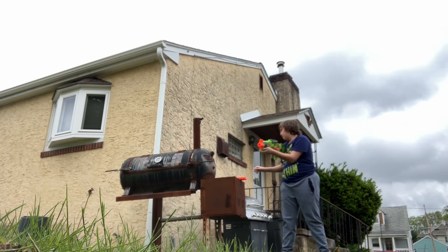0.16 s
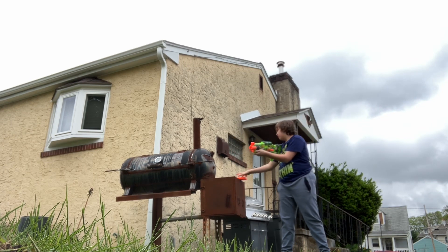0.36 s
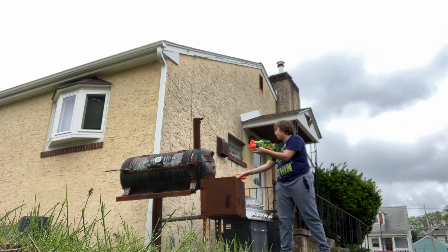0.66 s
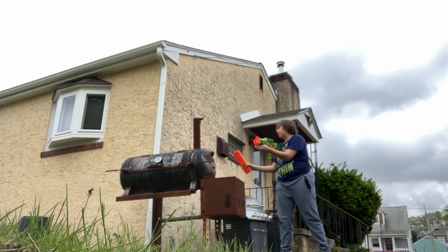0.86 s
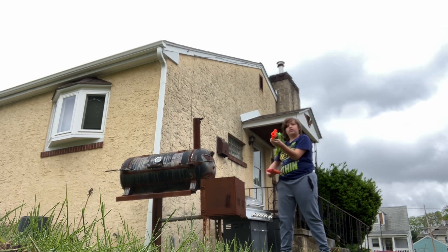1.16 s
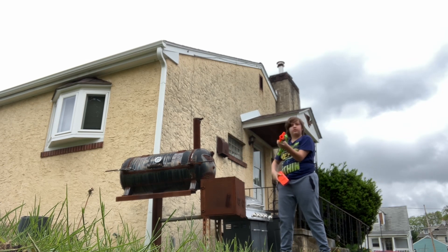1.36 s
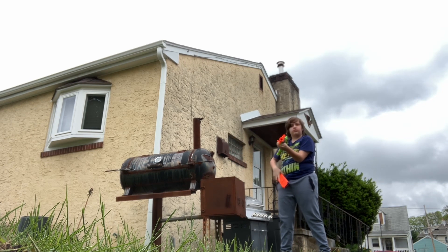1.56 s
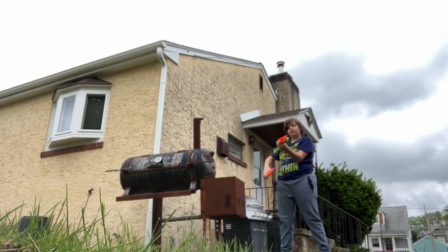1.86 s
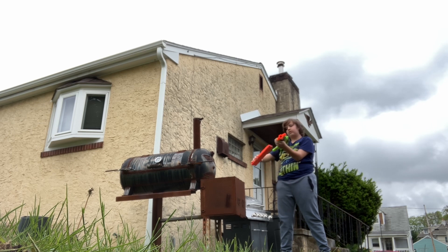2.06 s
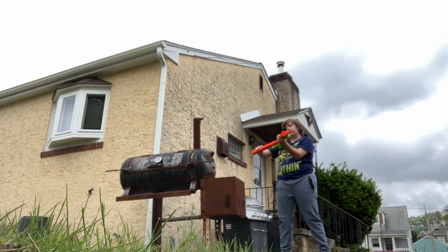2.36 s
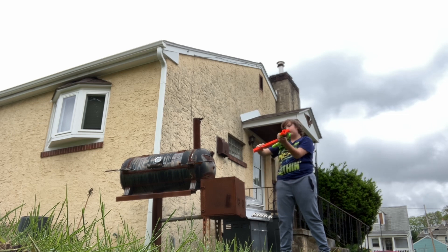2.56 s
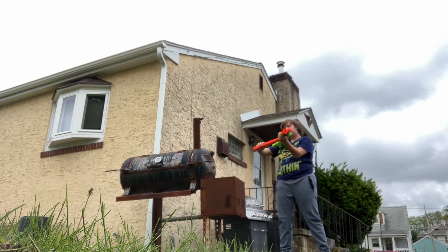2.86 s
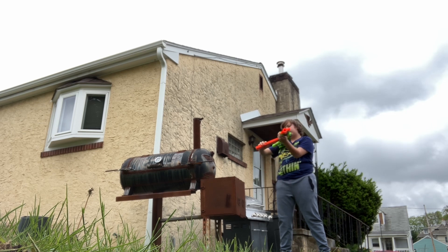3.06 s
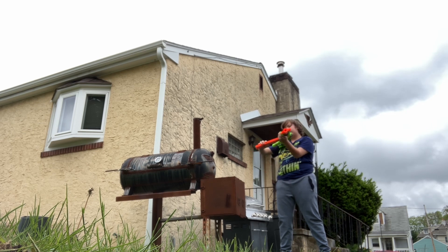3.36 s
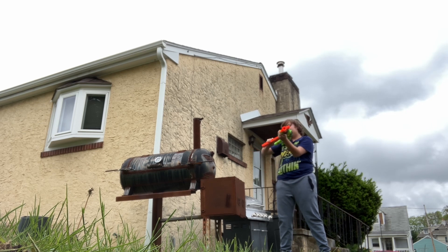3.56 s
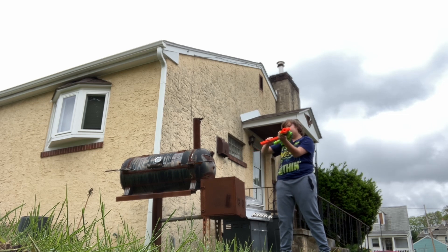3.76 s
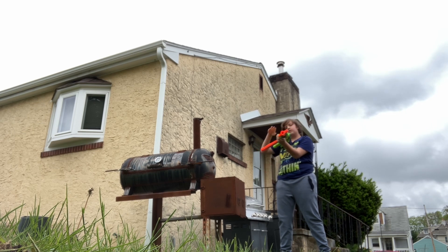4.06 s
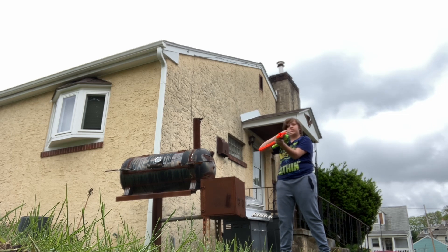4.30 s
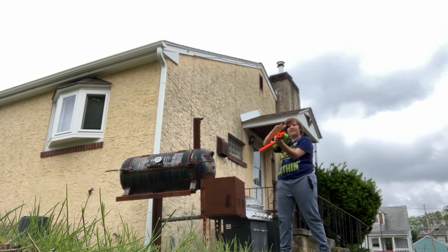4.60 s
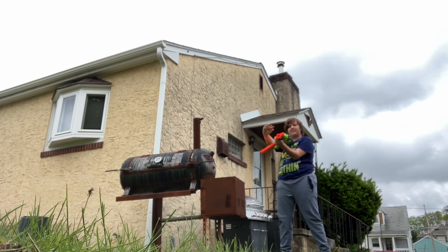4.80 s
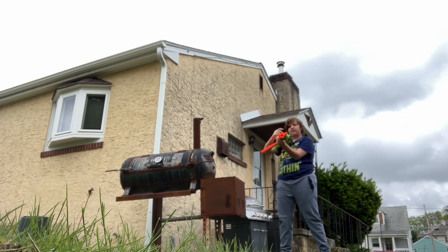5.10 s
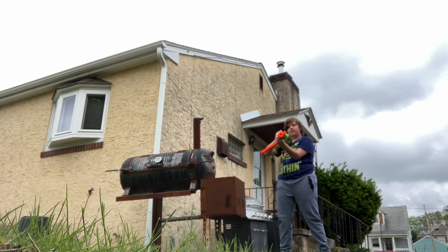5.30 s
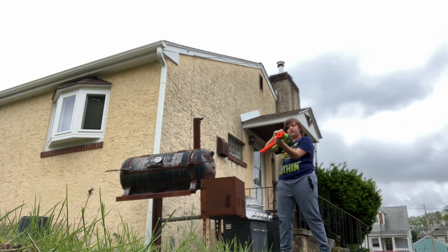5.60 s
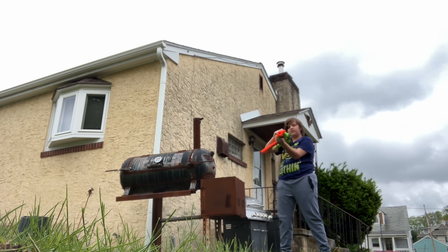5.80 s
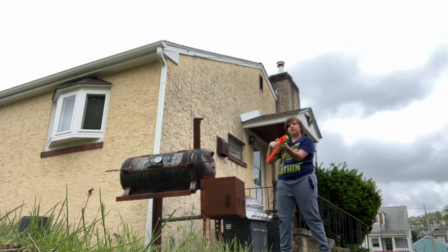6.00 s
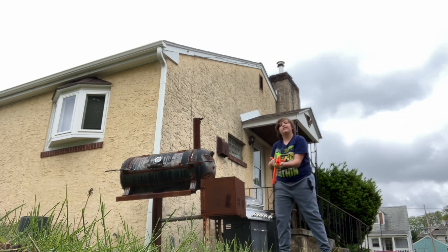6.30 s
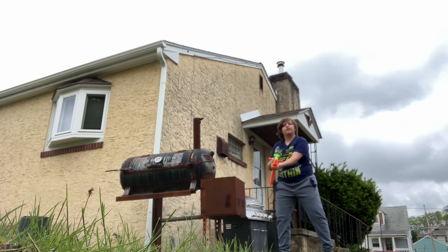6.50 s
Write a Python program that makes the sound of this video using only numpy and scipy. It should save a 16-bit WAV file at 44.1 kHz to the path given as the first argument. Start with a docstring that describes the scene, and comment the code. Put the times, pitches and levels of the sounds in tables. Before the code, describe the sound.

Quiet yard ambience: low town rumble, thin birdsong, some clear and some raspy, a very faint hum and light hiss. Several metres away, light plastic parts tick and click, then a toy gun gives three crisp, hollow snaps roughly a second apart, the first strongest, the middle one more of a ratchety chatter. Dry, short outdoor echoes follow; a last tiny rattle fades into the birds.

```python
"""A plastic toy blaster is loaded and snapped a few metres away on a lawn beside a house.
Each snap is a quick run of knocks: noise bursts filtered into hollow body, shell clack and bright tick,
with scattered echoes from ground and walls. Small birds chirp near and far as gliding sines and rasps of
banded noise. Behind them lie a town rumble of shaped noise, a faint machine hum and microphone hiss."""
import sys
import numpy as np
from scipy import signal
from scipy.fft import rfft, irfft, next_fast_len
from scipy.io import wavfile
from scipy.ndimage import uniform_filter1d

SR = 44100
rng = np.random.default_rng(int(sys.argv[2]) if len(sys.argv) > 2 else 0)


def to_wav(s):
    """Save 16-bit WAV."""
    ch = np.atleast_2d(s).T  # columns
    pcm = np.round(np.clip(ch, -1, 1) * 32767)  # PCM
    wavfile.write(sys.argv[1], SR, pcm.astype(np.int16))


def convert_level_to_amplitude(level_db):
    """Map a level in decibels to its linear amplitude factor."""
    exponent = np.asarray(level_db, float) / 20
    return 10 ** exponent


N = 293219
SIZE = next_fast_len(N + SR)  # transform length with room for tails
HZ = np.arange(SIZE // 2 + 1) * SR / SIZE


def along(table, column=1):
    """A table column read on a log-frequency axis."""
    table = np.array(table, float)
    return np.interp(np.log(HZ + 1), np.log(table[:, 0]), table[:, column])


def shape(x, gain):
    """Filter by a gain per frequency."""
    return irfft(rfft(x, SIZE) * gain, SIZE)[..., :N]


def add(out, s, sound):
    """Mix a short sound in at a time in seconds."""
    part = out[int(s * SR):][:len(sound)]
    part += sound[:len(part)]


def unit(x):
    """Scale to rms 1."""
    return x / np.sqrt(np.mean(x ** 2))


def ring(hz, width_hz):
    """Causal resonance, gain 1 at its centre."""
    return 1 / (1 + 1j * (HZ ** 2 - hz ** 2) / (width_hz * (HZ + 1e-9)))


def steady(gain):
    """Gain that leaves white noise at the same power."""
    return gain / np.sqrt(np.mean(abs(gain) ** 2))


def walk(rate):
    """Random levels slewed at about rate per second; rms 1."""
    k = int(SR / rate)
    smooth = uniform_filter1d(rng.standard_normal(N), k)
    return unit(uniform_filter1d(smooth, k))


def blaster():
    """Every knock is a burst of tiny contacts that rings the hollow body, clacks in the shell and ticks."""
    # a part hits its stop and the air in the shell thumps: t/s, f/Hz, width/Hz, starting level/dB
    thumps = [(3.456, 220, 150, -31), (5.559, 330, 60, -28)]
    # colour of each layer: f/Hz, relative level/dB per Hz
    body = [(120, -34), (250, -2.5), (500, 3.5), (900, 5), (1300, -28)]
    clack = [(800, -25.5), (1200, 3), (3000, -2), (4300, -9.5), (5500, -7), (7500, -34.5)]
    tick = [(4000, -21), (6500, -14.5), (8200, -3.5), (10000, -0.5), (12800, -4), (15000, -5.5),
            (16300, -26)]
    # seconds that body, clack and tick take to build up and to rattle away
    contact_s = np.array([.002, .0016, .0006])[:, None]
    rattle_s = np.array([.006, .0051, .0048])[:, None]

    t = np.arange(SR // 16) / SR
    fades = (1 - np.exp(-t / contact_s)) * np.exp(-t / rattle_s)
    fades = fades / fades.max(axis=1, keepdims=True)
    layers = np.zeros((3, N + SR))
    for s, *db in knocks():
        # contacts of uneven size
        size_db = 1.2 * rng.exponential(size=len(t))
        burst = unit(rng.standard_normal(len(t)) * convert_level_to_amplitude(size_db))
        layers[:, int(s * SR):][:, :len(t)] += convert_level_to_amplitude(np.array(db)[:, None]) * burst * fades

    resonance = shell()
    colours = [steady(convert_level_to_amplitude(along(table)) * resonance) for table in (body, clack, tick)]
    sound = shape(layers[:, :N], np.array(colours)).sum(axis=0)
    for s, hz, width, db in thumps:
        add(sound, s, convert_level_to_amplitude(db) * np.exp(-np.pi * width * t) * np.sin(2 * np.pi * hz * t))
    return sound


def knocks():
    """All contacts as (s, body dB, clack dB, tick dB): lone knocks, then each slide ridge by ridge."""
    # single knocks of plastic on plastic: t/s, clack level/dB, brightness (tick above clack)/dB
    lone = [(0.618, -58.5, -14.5), (0.641, -63, -35), (1.252, -66.5, -11), (2.375, -59, -12.5),
            (2.454, -56.5, -0.5), (2.476, -53, -13), (2.492, -51.5, -16), (2.561, -60.5, -38),
            (2.845, -61.5, -35), (2.884, -52.5, 4.5), (2.949, -46, -11), (3.002, -59.5, -35),
            (3.406, -45, -8.5), (3.41, -35, -6.5), (3.425, -46.5, -6), (3.45, -27, 7.5),
            (3.453, -21.5, -9.5), (3.457, -26.5, -24.5), (3.599, -57.5, -25.5), (3.765, -54.5, -12),
            (3.96, -67.5, -18.5), (4.531, -42, -9), (4.589, -51, -0.5), (4.615, -42, -2.5),
            (5.155, -56.5, -5.5), (5.172, -61, -17), (5.194, -51, -26.5), (5.284, -62, -26),
            (5.317, -59.5, -31.5), (5.555, -39, -0.5), (5.56, -35.5, -16), (5.785, -55.5, -42),
            (6.259, -61.5, -30)]
    # a part slides and chatters over ridges: start t/s, length/s, clack level/dB, brightness/dB
    slides = [(2.9, .046, -48.5, -16.5), (3.436, .013, -27.5, 0), (4.538, .044, -33, 2.5),
              (5.507, .024, -47.5, -13), (5.543, .011, -27, 0.5), (6.013, .03, -56.5, -12.5)]
    knock_body_db = -2.5  # hollow body relative to clack
    ridge_s, scatter_db = .0068, 2.5  # time between ridges of a bright slide; unevenness
    dull_slows = .04  # a slower slide is duller: share of extra time between ridges per dB of dullness
    grip_db, grip_s = -1.5, .0059  # the clack starts this much weaker and builds up
    # glancing contacts hardly move the body, less the brighter (dB per dB)
    slide_body_db, body_per_bright = -11, -.51

    rows = [(s, db + knock_body_db, db, db + bright) for s, db, bright in lone]
    chances = rng.standard_normal((len(slides), 16, 3))
    for (s, length, db, bright), chance in zip(slides, chances):
        gap = ridge_s * (1 + dull_slows * max(-bright, 0))
        for t, uneven in zip(np.arange(0, length, gap), scatter_db * chance):
            offsets = [slide_body_db + body_per_bright * bright, grip_db * np.exp(-t / grip_s), bright]
            rows.append((s + t, *(db + uneven + offsets)))
    return rows


def shell():
    """Plastic shell as a direct path plus damped resonances in parallel."""
    # shell modes: f/Hz, width/Hz (widened 2.5 times below), level/dB (raised 1 dB below)
    modes = [(563, 37, -2), (968, 22, 3.5), (1633, 67, -6.5), (1883, 13, -5.5), (2345, 23, -4.5),
             (2650, 19, -3)]
    return 1 + convert_level_to_amplitude(1) * sum(convert_level_to_amplitude(db) * ring(hz, 2.5 * width) for hz, width, db in modes)


def diffuse(count):
    """Two-channel noise from all around, partly shared by the microphone ports."""
    # how alike diffuse sound is at the two ports: f/Hz, likeness/0-1
    likeness = [(60, .95), (300, .8), (1200, .2), (3000, .4), (9000, .7)]
    mid, side = rfft(rng.standard_normal((2, count)), SIZE)
    alike = np.clip(along(likeness), 0, 1)
    shared = np.sqrt((1 + alike) / 2) * mid
    opposed = np.sqrt((1 - alike) / 2) * side * np.array([[1], [-1]])
    return irfft(shared + opposed, SIZE)[:, :count]


def yard(x, near_db, far_db):
    """Scattered echoes: a short tail from ground and wall, a later long one from the houses around."""
    # echo decay: f/Hz, near walls t60/s, far houses t60/s
    decay = np.array([(300, 0.18, 0.26), (2500, 0.092, 0.91), (5000, 0.21, 1), (10090, 0.069, 0.33)])
    t = np.arange(SR) / SR
    noise, answer = rfft(diffuse(SR), SIZE), 0
    for hz in 150 * 2 ** np.arange(7):
        near, far = (np.interp(np.log(hz), np.log(decay[:, 0]), decay[:, k]) for k in (1, 2))
        near_tail = convert_level_to_amplitude(near_db - 60 * t / near) * (1 - np.exp(-t / .00073))
        far_tail = convert_level_to_amplitude(far_db - 60 * t / far) * (1 - np.exp(-t / .025))
        octave = np.cos(np.pi / 2 * np.clip(np.log2((HZ + 1) / hz), -1, 1)) ** 2
        answer = answer + irfft(noise * octave, SIZE)[:, :SR] * (near_tail + far_tail)
    echoes = shape(x, rfft(answer, SIZE) / np.sqrt(SR / 100))
    # fast random level changes roughen the echoes
    return echoes * convert_level_to_amplitude(1.5 * walk(250))


def birds():
    """Near birds echo a little; the far chorus is blurred by echoes and comes in bouts."""
    # fast uneven loudness roughens the clear near notes
    near = clear_notes() * convert_level_to_amplitude(4.0 * walk(200)) + hoarse_chirps()
    far = far_chips()
    chorus = unit(far + yard(far, -5, -11)) * bouts()
    flock = near + yard(near, -16, -26) + chorus
    # the birds sit to one side of the toy, so they reach the left port first
    lead_s = .00013
    return shape(flock, np.exp(1j * np.pi * HZ * lead_s * np.array([[1], [-1]])))


def whistle(length, hz, db):
    """A near-sine gliding through three pitches, smoothed at the bend, under a rounded envelope."""
    u = np.linspace(0, 1, int(length * SR))
    pitch = uniform_filter1d(np.interp(u, [0, .5, 1], hz), len(u) // 4)
    return convert_level_to_amplitude(db) * np.sin(np.pi * u) ** .7 * np.sin(2 * np.pi * np.cumsum(pitch) / SR)


def clear_notes():
    """Pure bird notes as whistles, either arched or straight."""
    # arched chips, up then down: t/s, length/s, top f/Hz before smoothing, peak level before roughening/dB
    arches = [(0.112, .051, 4564, -75), (0.822, .055, 4920, -74), (1.054, .081, 2974, -68),
              (1.496, .043, 4851, -69), (1.93, .038, 4300, -75), (2.543, .044, 4780, -65),
              (3.005, .032, 4600, -63), (3.078, .044, 4720, -69), (4.168, .057, 4830, -74),
              (5.345, .043, 4945, -68)]
    # straight whistles: t/s, length/s, start f/Hz, end f/Hz, peak level before roughening/dB
    glides = [(.16, 0.054, 4500, 4940, -68.5), (0.284, 0.0317, 5280, 5250, -78),
              (.5, 0.14, 4870, 4800, -81), (0.61, .04, 3850, 3380, -68.5),
              (.988, 0.0455, 3680, 2500, -63.5), (1.78, 0.22, 3150, 3070, -80),
              (1.4, .035, 5340, 5160, -77), (3.1, 0.036, 2980, 2500, -77.5), (4.049, .15, 8200, 7800, -83),
              (4.694, 0.0487, 4726, 4370, -65), (5.712, 0.03, 4700, 3920, -60.5),
              (6.23, 0.025, 4580, 4410, -68.5)]
    rise_hz, fall_hz = 730, 650  # climb to the top of an arch and drop from it
    notes = np.zeros(N)
    for s, length, hz, db in arches:
        add(notes, s, whistle(length, [hz - rise_hz, hz, hz - fall_hz], db))
    for s, length, start, end, db in glides:
        add(notes, s, whistle(length, [start, (start + end) / 2, end], db))
    return notes


def hoarse_chirps():
    """Rasping calls of band-passed noise that swell and fade."""
    # chirps: t/s, length/s, centre f/Hz, width/Hz, rasp level before the envelope/dB
    calls = [(0, 0.089, 2730, 605, -72), (0.173, 0.05, 2430, 1560, -70.5), (0.38, 0.065, 2750, 1140, -58),
             (0.642, 0.1, 2540, 250, -70), (.79, 0.1145, 3293, 400, -69.5), (1.313, 0.087, 2640, 1210, -66),
             (3.212, 0.094, 3650, 400, -74), (3.651, 0.049, 3240, 796, -57),
             (4.801, 0.07, 2920, 915, -57.5), (4.993, 0.027, 2240, 399.5, -71.5),
             (5.687, 0.026, 2260, 500, -61), (5.703, 0.048, 3397, 405, -64.5),
             (6.423, 0.052, 2650, 880, -67)]
    chirps = np.zeros(N)
    for s, length, hz, width, db in calls:
        band = signal.butter(4, [hz - width / 2, hz + width / 2], "band", fs=SR, output="sos")
        rasp = unit(signal.sosfilt(band, rng.standard_normal(SR // 8)))[-int(length * SR):]
        add(chirps, s, convert_level_to_amplitude(db) * rasp * np.hanning(len(rasp)))
    return chirps


def far_chips():
    """A crowd of quick steep whistles, up then down, at random times, pitches and levels."""
    far = np.zeros(N)
    for when, long, pitch, up, down, size in rng.random((400, 6)):
        hz = 2400 + 2400 * pitch
        chip = whistle(.012 + .025 * long, [hz - 1300 * up, hz, hz - 1500 * down], -15 * size)
        add(far, when * N / SR, chip)
    return far


def bouts():
    """Gain of the far chorus: a lull, with bouts that fade in and out."""
    # far birds sing in bouts: start t/s, length/s, level added to the lull/dB
    singing = [(0.103, 0.861, -81.5), (1.25, 0.335, -84), (1.78, 0.506, -82), (2.884, 0.2, -75),
               (3.543, 0.46, -76.5), (4.18, 0.168, -81.5), (4.623, 0.99, -80), (6.099, 0.37, -79.5)]
    fade_s, lull_db = .14, -89.5
    t = np.arange(N) / SR

    def on(s):
        """Ramp from 0 to 1 centred on a time."""
        return np.clip((t - s) / fade_s + .5, 0, 1)

    return convert_level_to_amplitude(lull_db) + sum(convert_level_to_amplitude(db) * (on(s) - on(s + length)) for s, length, db in singing)


def town():
    """Far traffic as shaped diffuse noise that swells slowly, the tyres more than the engines."""
    # rumble colour: f/Hz, relative level/dB per Hz
    colour = [(25, -22), (45, -5), (70, 1), (150, -2.5), (220, -9), (350, -17.5), (900, -25.5),
              (1500, -33.5), (4300, -37.5), (6000, -52.5)]
    # swell of the rumble: t/s, level/dB
    traffic = [(0, 3), (.8, 3.5), (1.6, 2), (3, 0.5), (4.3, -0.5), (5.5, -0.5), (6.65, 2)]
    level_db = -60.5  # before the swell
    tyres_hz, tyres_swell = 606, 1.4  # tyre noise lies above; it swells this many times the dB
    swell_db = np.interp(np.arange(N) / SR, *np.transpose(traffic))
    roar = unit(shape(diffuse(N), convert_level_to_amplitude(along(colour)))) * convert_level_to_amplitude(level_db)
    engines = shape(roar, 1 / (1 + (HZ / tyres_hz) ** 4))
    tyres = roar - engines
    # both waver at random, the tyre noise in quicker, stronger lumps
    engines = engines * convert_level_to_amplitude(swell_db + 1.1 * walk(3.7))
    return engines + tyres * convert_level_to_amplitude(tyres_swell * swell_db + 2.1 * walk(8))


def machine_hum():
    """Noise through a narrow double resonance: a faint tone of wavering level."""
    tone = unit(shape(rng.standard_normal(N), ring(480.1, 9.0) ** 2))
    return tone * convert_level_to_amplitude(-78 + 2.5 * walk(3))


def hiss():
    """Even microphone hiss: flat noise up to 15.2 kHz."""
    return convert_level_to_amplitude(-82.5) * shape(diffuse(N), HZ < 15200)


def scene():
    """Toy with its echoes, birds and background."""
    toy = blaster()
    echoes = yard(toy, near_db=-5, far_db=-29)
    return toy + echoes + birds() + town() + machine_hum() + hiss()


def band_limit(x):
    """A steep low-pass at the top of the band."""
    return signal.sosfilt(signal.butter(12, 16670, fs=SR, output="sos"), x)


def record(dry):
    """Two microphone ports that differ in phase and level with frequency."""
    # left port against right: f/Hz, left phase lead/rad
    port_phase = [(0, 0), (600, -.9), (1100, -1.1), (1500, .3), (2700, -1.4), (3400, -1.4), (3900, -3.1),
                  (6000, -3.3), (6600, -1.2), (7500, -1.4), (8500, 0), (9300, .2), (10700, 2.9),
                  (11500, 3.2), (13200, 6.1), (14300, 6.3), (15700, 9.2)]
    # left port against right: f/Hz, left minus right level/dB
    port_balance = [(150, 3.5), (380, 1.5), (700, -1.5), (1300, -6), (2400, -1.5), (4400, 1)]
    lead = np.interp(HZ, *np.transpose(port_phase))
    # each port takes half of the difference
    half = convert_level_to_amplitude(along(port_balance) / 2) * np.exp(.5j * lead)
    mix = shape(dry, np.array([half, 1 / half]))
    return band_limit(mix)


dry = scene()
out = record(dry)
to_wav(out)
```